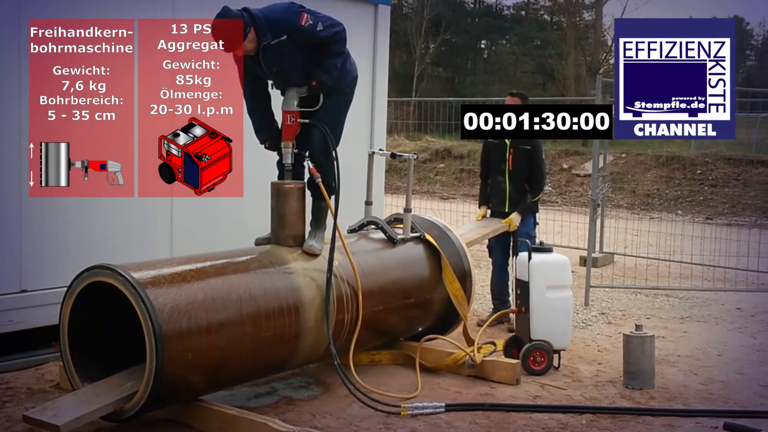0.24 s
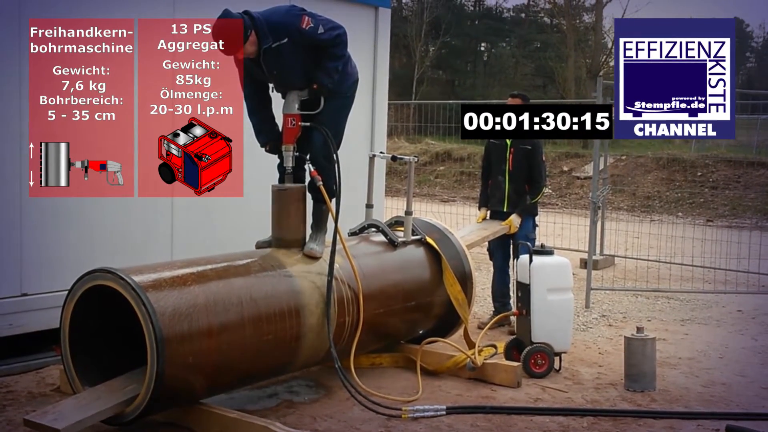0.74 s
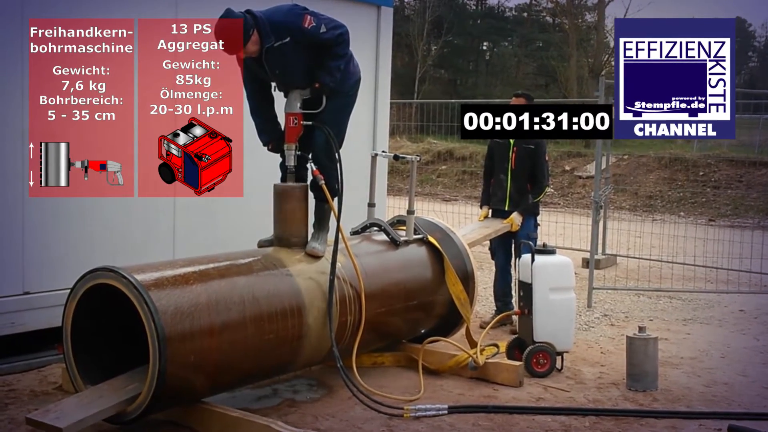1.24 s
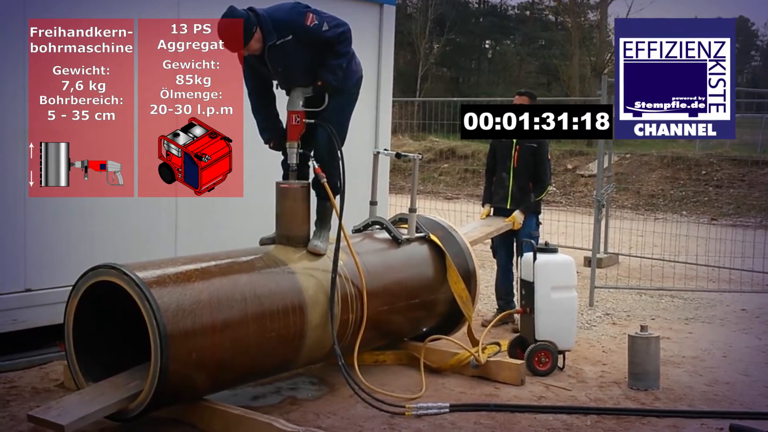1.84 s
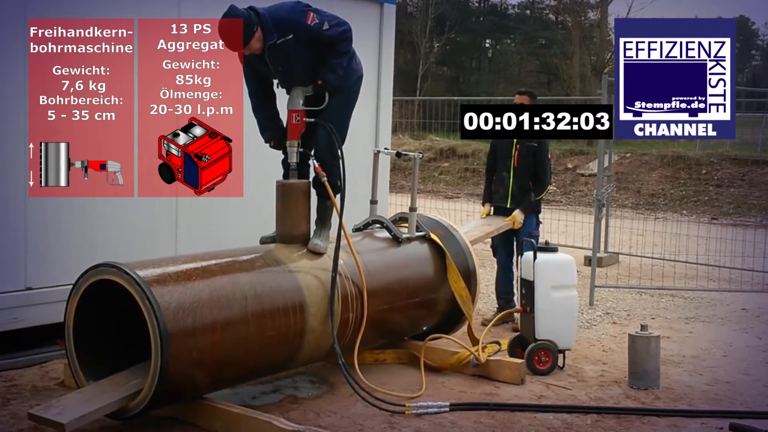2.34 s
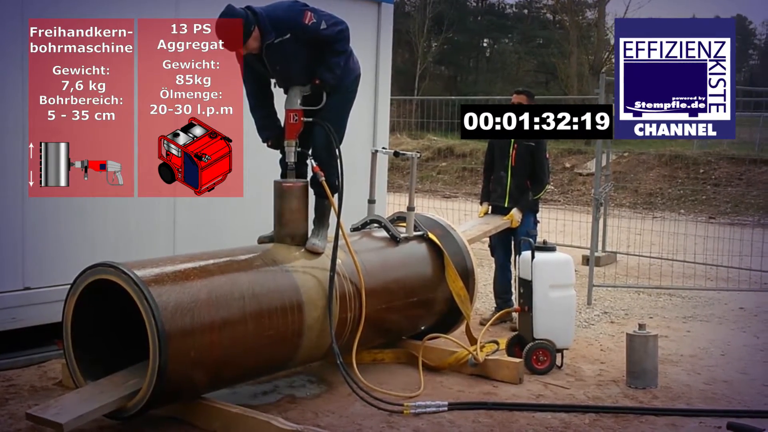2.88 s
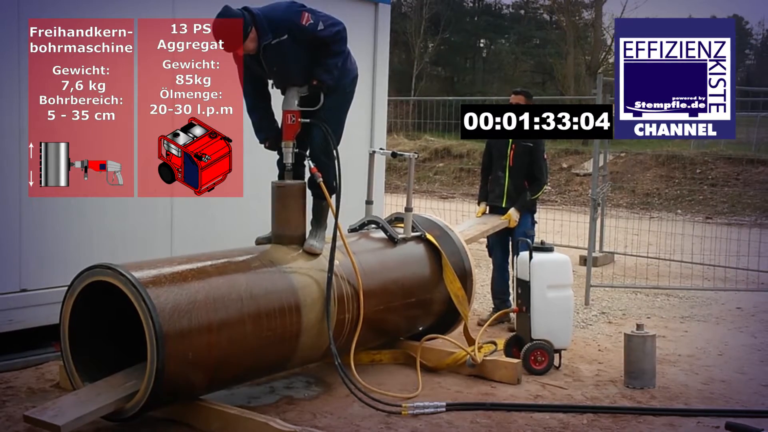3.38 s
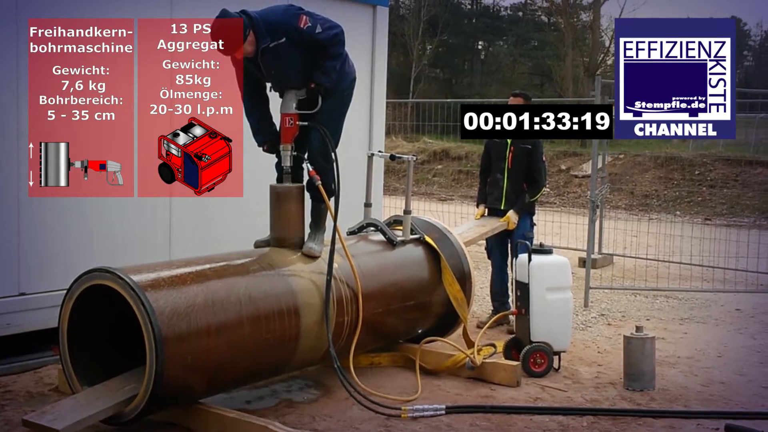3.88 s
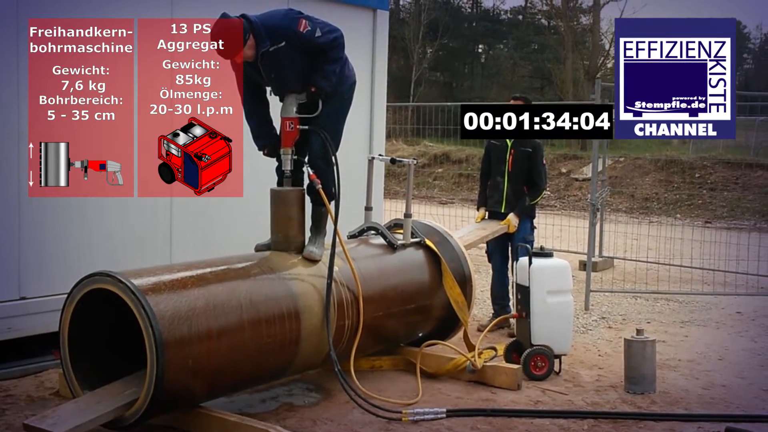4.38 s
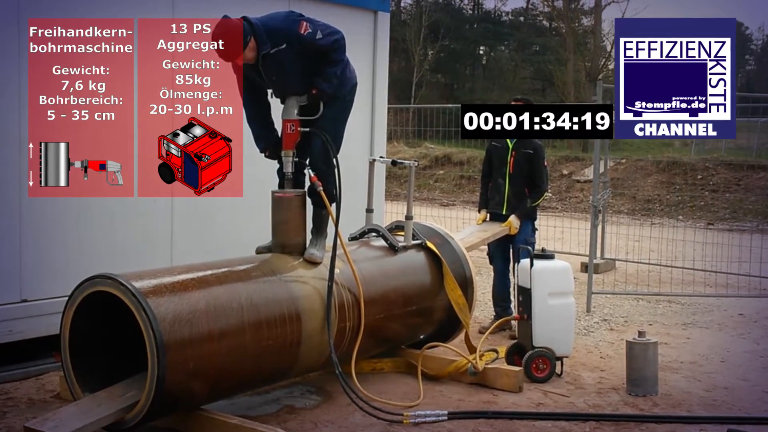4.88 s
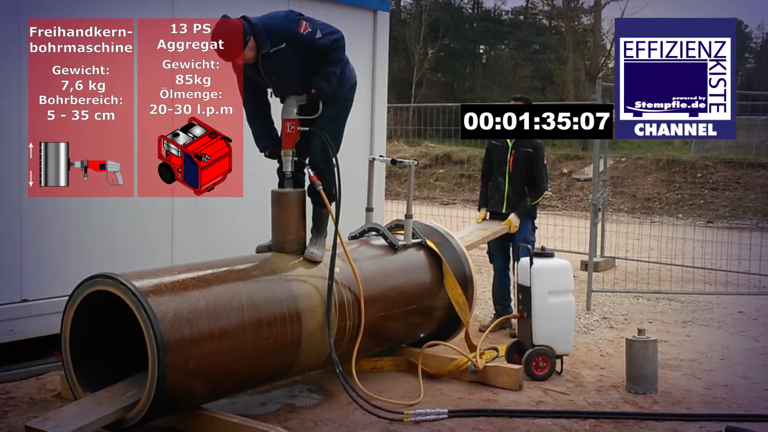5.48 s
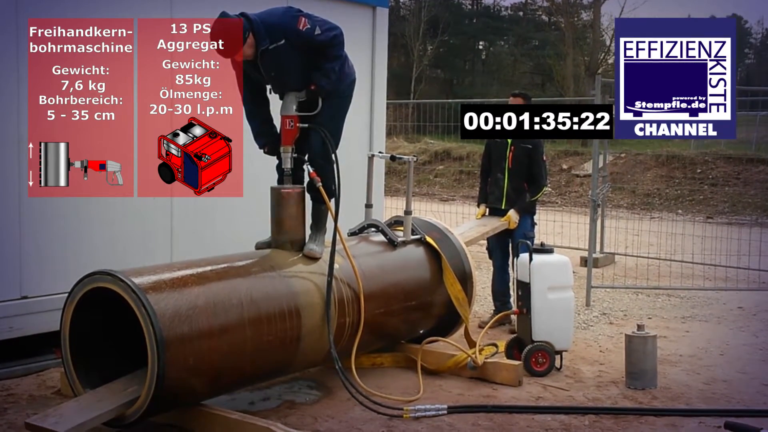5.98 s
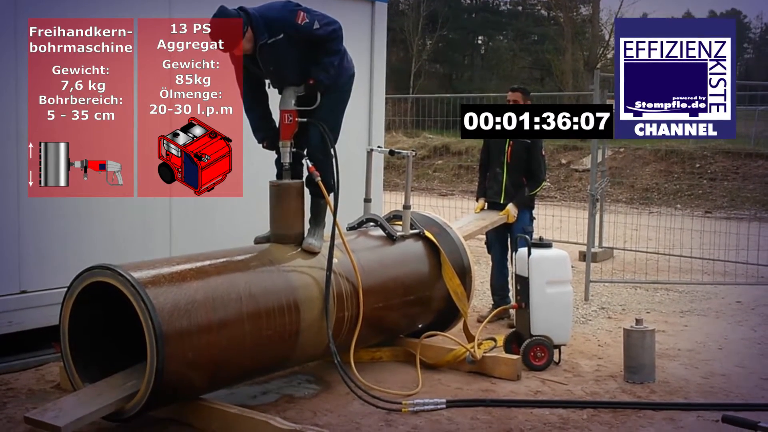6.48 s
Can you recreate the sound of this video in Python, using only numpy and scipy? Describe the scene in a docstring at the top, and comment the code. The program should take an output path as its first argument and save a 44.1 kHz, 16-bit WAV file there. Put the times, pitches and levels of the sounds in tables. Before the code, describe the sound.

A steady wall of machine noise in the open air: low, throbbing engine exhaust, fast metallic casing rattle on the left, and abrasive high grinding from a drill barrel on the right. All run together from beginning to end, with small uneven swells from hand pressure. The engine drone sinks a little as the grinding gains slightly. Two microphones give a broad, dry picture.

```python
"""Core drill in a stoneware pipe, hydraulic power pack nearby

Outdoors, a core drill grinds through a pipe while a one-cylinder power pack drones.
The exhaust is a sum of orders of a cycle near 25 Hz over a noisy rumble; the engine casing clatters once a
cycle to the left: pulsed grit through a colour and ringing modes. The grit of the turning crown rings the
steel barrel to the right. Two microphone ports hear partly different fields."""
import sys
import numpy as np
from scipy import signal
from scipy.fft import rfft, irfft, next_fast_len
from scipy.io import wavfile
from scipy.ndimage import uniform_filter1d, map_coordinates

SR = 44100
rng = np.random.default_rng(int(sys.argv[2]) if len(sys.argv) > 2 else 0)


def invert_db(x):
    """Field ratio 10**(x/20) for x, a level in decibels (scalar or array-like)."""
    u = np.asarray(x, float) / 20
    return 10 ** u


def dump(signal):
    """Clip the signal to [-1, 1] and save it as 16-bit WAV at the path in sys.argv[1]."""
    limited = np.clip(np.atleast_2d(signal).T, -1, 1)
    pcm = np.round(limited * 32767).astype(np.int16)
    wavfile.write(sys.argv[1], SR, pcm)


N = 296793
SIZE = next_fast_len(N, real=True)
HZ = np.maximum(np.arange(SIZE // 2 + 1) * SR / SIZE, 1)


def unit(x):
    """Scale to rms 1."""
    return x / np.sqrt(np.mean(x ** 2))


def read(table, column=1):
    """A table column over frequency, straight on a log axis."""
    rows = np.array(table, float)
    return np.interp(np.log(HZ), np.log(np.maximum(rows[:, 0], 1)), rows[:, column])


def walk(rate_hz):
    """Random levels held 1 / rate_hz s and slewed twice, without the slowest drift; rms 1."""
    hold = int(SR / rate_hz)
    steps = np.repeat(rng.standard_normal(N // hold + 1), hold)
    slewed = uniform_filter1d(uniform_filter1d(steps, hold), hold)[:N]
    return unit(slewed - uniform_filter1d(slewed, 6 * hold))


def grit(scatter_db):
    """Dense tiny impacts of uneven size."""
    return unit(rng.standard_normal(N) * invert_db(scatter_db * rng.exponential(size=N)))


def ripple(spacing_hz=45):
    """Countless small modes of the metal: a fixed bumpiness over frequency, rms 1."""
    bumps = rng.standard_normal(int(SR / 40))
    return unit(map_coordinates(bumps, [HZ / spacing_hz], mode="mirror"))


def ports(near, far):
    """Spectra at the two ports: the right hears part of the left field, shifted in phase, plus its own."""
    # Each row: frequency in Hz, likeness of the two ports from 0 to 1.
    likeness = [(60, .96), (300, .8), (420, .4), (800, .45), (1000, .6), (1400, .15), (1650, .7),
                (2000, .15), (2900, .5), (3400, .55), (4000, .25), (5500, .35), (6100, .7), (7000, .65),
                (9000, .5), (10000, .35), (14000, .3)]
    # Each row: frequency in Hz, phase in radians by which the left port leads.
    lead_rad = [(30, .05), (150, .3), (400, .7), (750, 1.0), (1030, 1.7), (1350, 1.5), (1430, -1.1),
                (1640, -1.1), (2930, -2.9), (3360, -3.0), (3620, -2.0), (4570, -2.1), (5000, -2.5),
                (6290, -3.5), (7150, -4.6), (10100, -5.3), (12000, -5.2), (13200, -3.9), (14800, -5.2)]
    alike = np.clip(read(likeness), 0, 1)
    left = rfft(near, SIZE)
    shared = alike * np.exp(-1j * read(lead_rad)) * left
    own = np.sqrt(1 - alike ** 2) * rfft(far, SIZE)
    return np.array([left, shared + own])


def texture(colour, drive, scatter_db, flicker_db, rate_hz):
    """Grit through a colour, in half-octave bands that each flicker alone; the mid has rms 1."""
    pair = ports(grit(scatter_db) * drive, grit(scatter_db) * drive)
    colour_db = np.array([read(colour, column=1), read(colour, column=2)])
    pair = pair * invert_db(colour_db + 1.56 * ripple())
    place = 2 * np.log2(HZ)  # in half octaves
    low, high = (int(2 * np.log2(colour[k][0])) for k in (0, -1))
    out = 0
    for band in range(low, high + 2):
        share = np.cos(np.pi / 2 * np.clip(place - band, -1, 1)) ** 2
        out = out + irfft(pair * share, SIZE)[:, :N] * invert_db(flicker_db * walk(rate_hz))
    return out / np.std(out.mean(axis=0))


def ring(modes, drive, wander_db, rate_hz):
    """Each mode is a resonance shaken by grit that swells and fades by itself."""
    shaken = ports(grit(.8) * drive, grit(.8) * drive)
    out = 0
    for hz, width_hz, left_db, right_db in modes:
        resonance = 1 / (1 + 2j * (HZ - hz) / width_hz)
        pair = irfft(shaken * resonance, SIZE)[:, :N]
        level_db = np.array([[left_db], [right_db]]) + wander_db * walk(rate_hz)
        out = out + pair / np.std(pair[0]) * invert_db(level_db)
    return out


def exhaust(cycle_rad, wander_db=0.84):
    """Steady orders of the cycle; the silencer spreads each blast into about three uneven throbs."""
    # Each row: multiple of the cycle, relative level in dB before the port gains.
    orders = [(1, -42), (2, -9.5), (3, -7.5), (4, -3.5), (5, 1), (6, -6), (7, -5.5), (8, -6.5), (9, -7),
              (10, -15), (11, -15), (12, -6.5), (13, -25), (14, -16), (15, -23), (16, -47.5), (17, -37),
              (18, -42), (19, -34), (20, -28), (21, -18), (22, -39.5), (23, -47.5), (24, -25), (25, -20),
              (26, -18)]
    # Noise colour. Each row: frequency in Hz, left and right relative levels in dB.
    rumble = [(25, -5, -3), (59.7, -16, -5), (120, -8.5, 4.5), (304, 5, -3), (370, -6, -0.5),
              (407, -6.5, -5.5), (496, -2.5, -1.5), (730, -5.5, -8), (920, -3, -4), (1310, -6.5, -18)]
    out = 0
    for order, db in orders:
        phase_rad = order * cycle_rad + np.pi * (.35 * order ** 2 - 1.31 * order + 1.85)
        level = invert_db(db + wander_db * walk(4.06))
        jitter_rad = 0.028 * min(order, 12.5) * walk(25)
        tone = level * np.exp(1j * (phase_rad + jitter_rad))
        # the right port faces it more in the bass and hears it a little later
        left = tone.real * invert_db(order / 11.0)
        right = (tone * np.exp(-.04j * order)).real * invert_db(3.0)
        out = out + np.array([left, right])
    hum = out / np.std(out.mean(axis=0))
    return hum + invert_db(-8.5) * texture(rumble, 1, scatter_db=0.44, flicker_db=3.1, rate_hz=14)


def clatter(cycle_rad):
    """Valve gear and combustion shake the casing hardest just after each firing, some firings harder."""
    # Noise colour. Each row: frequency in Hz, left and right relative levels in dB.
    colour = [(510, -25.5, -31), (1040, -13, -16.5), (1430, -12.5, -17.5), (1620, -7.5, -15.5),
              (2100, -6, -14.5), (2710, -7.5, -14.5), (3000, -9.5, -15), (3640, -7, -6), (4040, -8.5, -21),
              (4326, -0.5, -10.5), (4590, 0.5, -14.5), (5040, -4.5, -12), (5450, -6.5, -12),
              (6000, -10.5, -30), (7540, -36, -42)]
    # Ringing casing. Each row: frequency in Hz, width in Hz, left and right relative levels in dB.
    casing = [(800, 25, -28, -27), (898, 22, -26, -27), (1226, 22, -24, -27), (1445, 25, -24, -32),
              (1044, 22, -22, -23), (1630, 28, -12, -20), (1765, 22, -18, -34), (2272, 25, -22, -32),
              (2355, 25, -23, -33), (3605, 35, -18, -19), (4435, 50, -11, -30), (4640, 30, -5, -27),
              (4860, 50, -15, -30), (5383, 45, -18, -32), (5830, 50, -19, -32), (5950, 50, -20, -33)]
    turns = cycle_rad / (2 * np.pi) - .06
    firing_gain = invert_db(3.0 * np.tanh(rng.standard_normal(N // 1000)))
    blow = firing_gain[np.floor(turns + 1).astype(int)]
    decay = np.exp(-(turns % 1) / 0.18)  # in cycles
    knock = 1 + 0.36 * uniform_filter1d(blow * decay, size=120)
    knock = unit(knock * invert_db(.5 * walk(4.2)))
    rattle = texture(colour, knock, scatter_db=1.0, flicker_db=0.8, rate_hz=8)
    return rattle + invert_db(1.5) * ring(casing, knock, wander_db=2.45, rate_hz=9.1)


def grinding(cycle_rad):
    """Diamond grit tears at the stoneware under an uneven hand, harder once a turn and at each passing
    segment; the oil flow pulses with the engine."""
    # Noise colour. Each row: frequency in Hz, left and right relative levels in dB.
    colour = [(4170, -17, -18), (5100, -21, -20), (5720, -11, -13), (6740, -7, -8.5), (7440, -13.5, -9),
              (9150, -17, -6), (9360, -15, -10), (10300, -19.5, -4.5), (10800, -27, -3), (11370, -26, -3),
              (12030, -17, 1), (12580, -16, -3.5), (12900, -17, -5.5), (13840, -13, -7), (14300, -9, -13),
              (15400, -15.5, -9.5)]
    # Ringing barrel. Each row: frequency in Hz, width in Hz, left and right relative levels in dB.
    barrel = [(5609, 35, -34, -21), (7150, 35, -27, -22), (9020, 40, -36, -20), (9900, 40, -45, -22),
              (10060, 45, -45, -20), (10357, 50, -45, -19), (10648, 60, -42, -16), (11490, 60, -40, -15),
              (11746, 30, -40, -10), (11993, 30, -36, -11), (11840, 50, -40, -15), (12080, 30, -36, -10),
              (12640, 60, -36, -18), (12330, 50, -36, -14)]
    crown_hz, segments = 11, 10
    turn_rad = 2 * np.pi * np.cumsum(crown_hz * (1 + .012 * walk(1.5))) / SR
    oil_db = 0.45 * np.cos(cycle_rad - 2.2)
    crown_db = 0.27 * np.cos(turn_rad) + 0.45 * np.cos(segments * turn_rad)
    hand_db = 0.46 * walk(6)
    push = unit(invert_db(oil_db + crown_db + hand_db))
    tearing = texture(colour, push, scatter_db=1.0, flicker_db=0.63, rate_hz=8)
    return tearing + invert_db(1.5) * ring(barrel, push, wander_db=2.8, rate_hz=11.0)


def scene():
    # Engine and recording level. Each row: time in seconds, engine cycle in Hz, level of the casing in dB.
    work = [(0.03, 25.0, -43), (0.51, 24.9, -44.5), (1.12, 25.0, -45.5), (1.66, 24.8, -44.5),
            (1.76, 24.76, -47), (2.3, 24.78, -44.5), (2.46, 25.05, -44.5), (2.89, 24.93, -43.5),
            (3.65, 24.71, -44), (3.89, 24.87, -43.5), (4.49, 24.94, -44), (5.17, 25.14, -44.5),
            (5.79, 24.97, -44), (6.48, 25.2, -45), (6.57, 24.84, -44), (6.7, 25.0, -45)]
    t = np.arange(N) / SR
    s, *columns = np.transpose(work)
    cycle_hz, casing_db = (np.interp(t, s, c) for c in columns)
    cycle_rad = 2 * np.pi * np.cumsum(cycle_hz) / SR
    mean_db = casing_db.mean()

    def follow(offset_db, share, drift_db_per_s):
        return invert_db(mean_db + offset_db + share * (casing_db - mean_db) + drift_db_per_s * t)

    exhaust_gain = follow(offset_db=-2.5, share=0.91, drift_db_per_s=-0.355)
    grind_gain = follow(offset_db=4.5, share=0.67, drift_db_per_s=0.16)
    return (exhaust_gain * exhaust(cycle_rad) + invert_db(casing_db) * clatter(cycle_rad)
            + grind_gain * grinding(cycle_rad))


def low_pass(x):
    """Removes everything above the highest recorded frequency."""
    return signal.sosfilt(signal.butter(12, 15270, fs=SR, output="sos"), x)


def record(dry):
    """The recorder cuts the top steeply with an elliptic low-pass."""
    top_hz = 14510
    steep = signal.ellip(12, .2, 70, top_hz, fs=SR, output="sos")
    mix = signal.sosfilt(steep, dry)
    return low_pass(mix)


dry = scene()
out = record(dry)
dump(out)
```